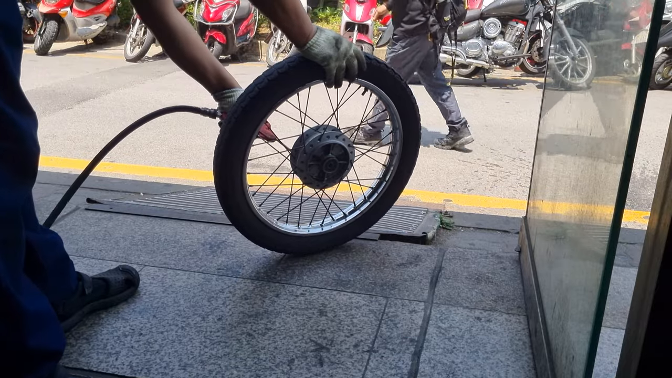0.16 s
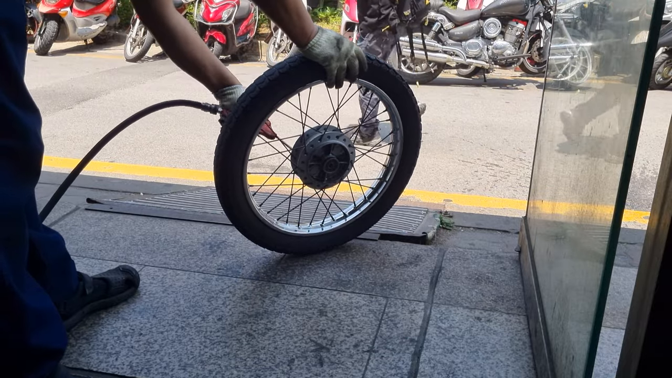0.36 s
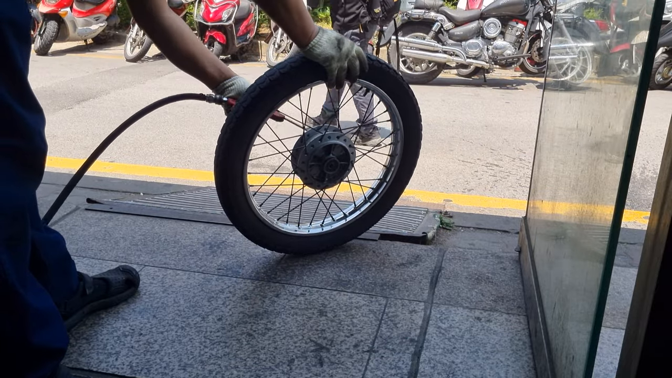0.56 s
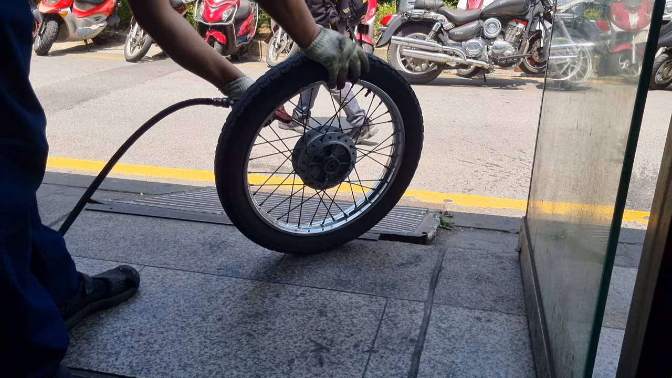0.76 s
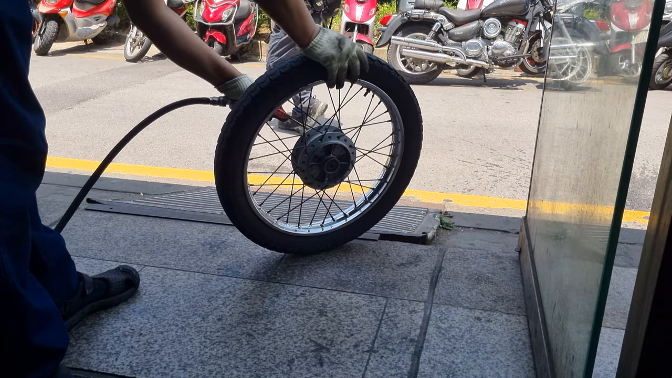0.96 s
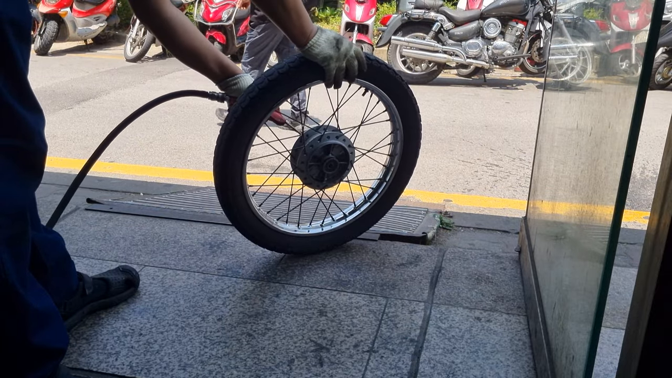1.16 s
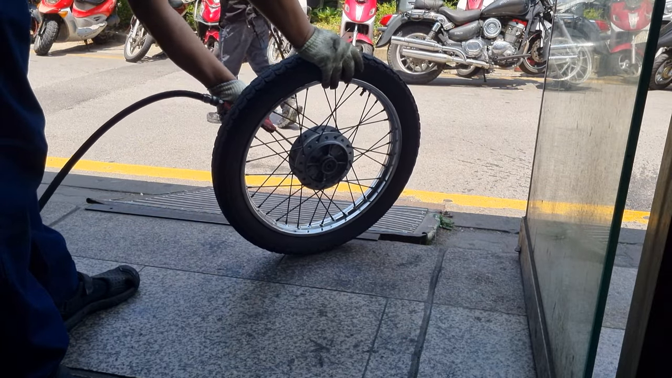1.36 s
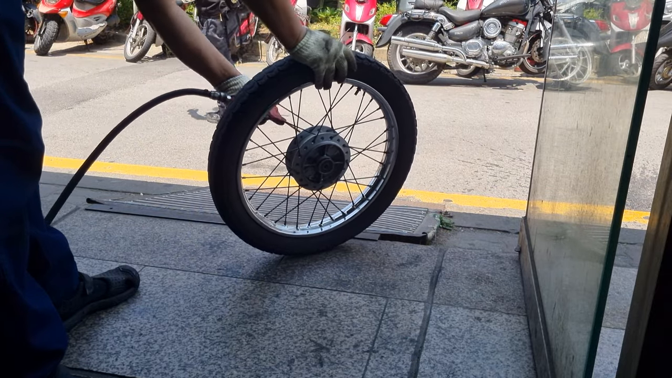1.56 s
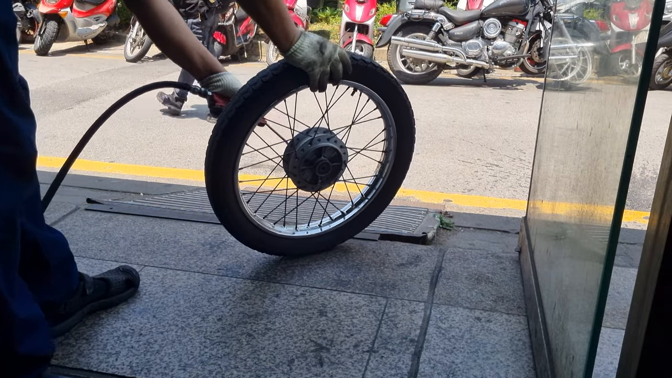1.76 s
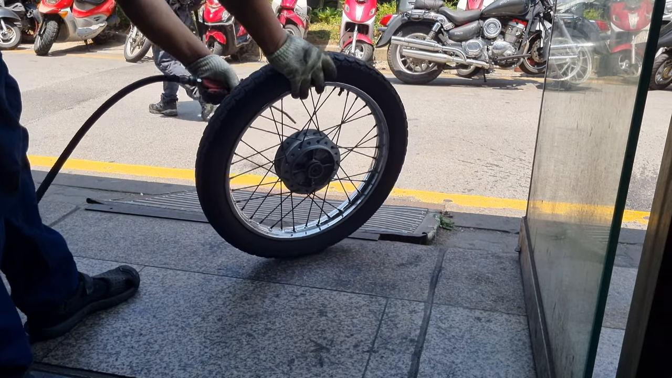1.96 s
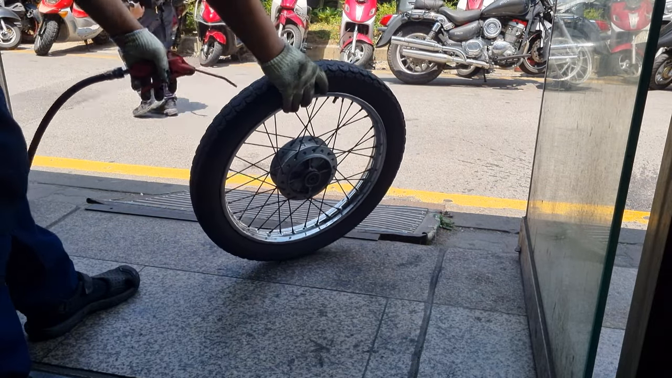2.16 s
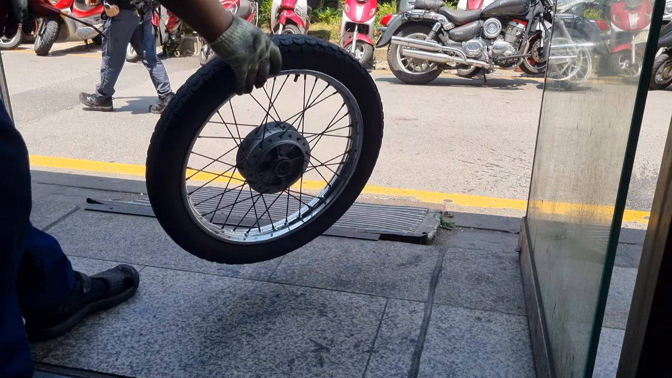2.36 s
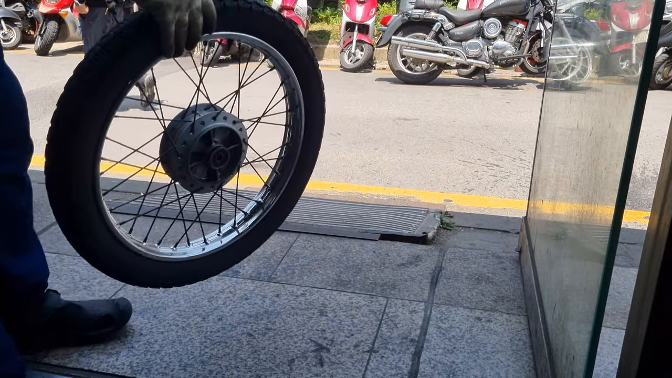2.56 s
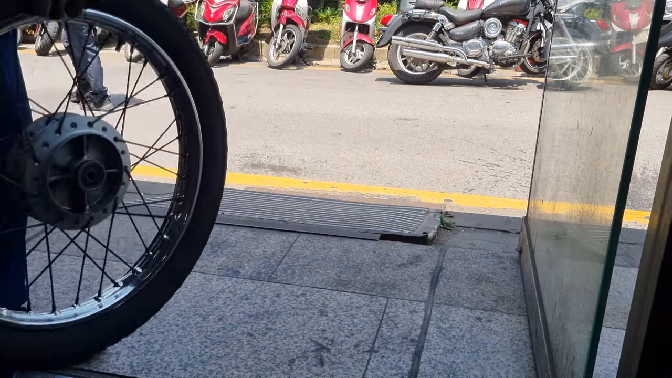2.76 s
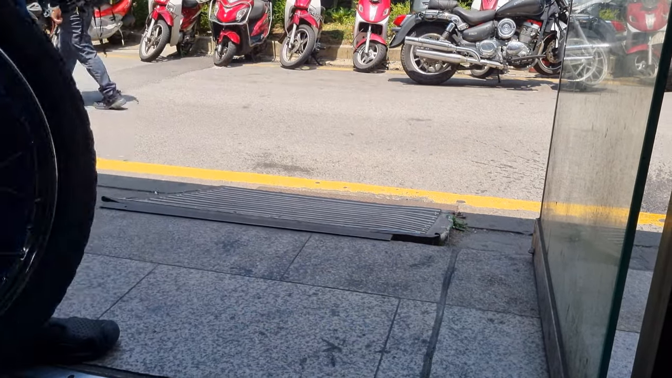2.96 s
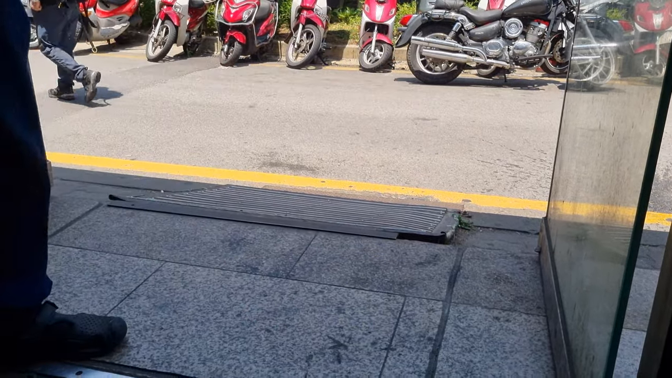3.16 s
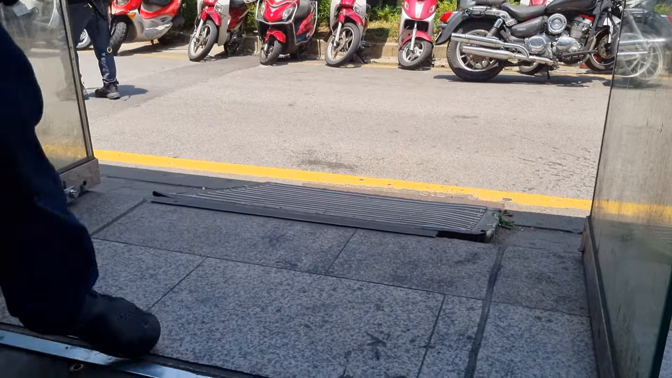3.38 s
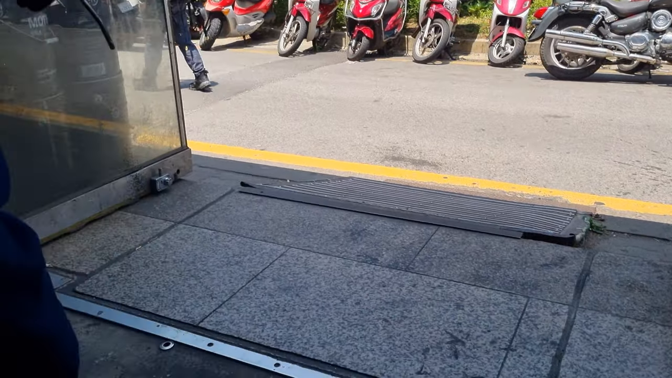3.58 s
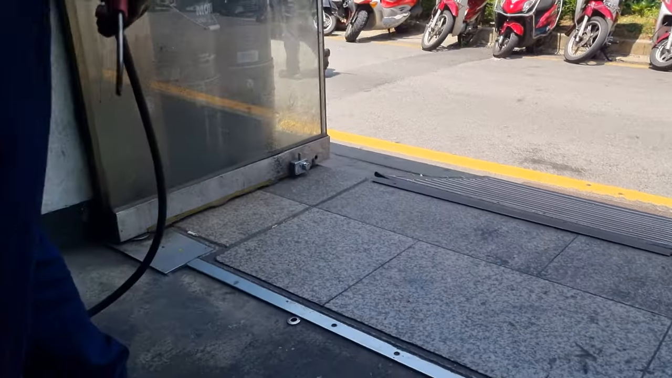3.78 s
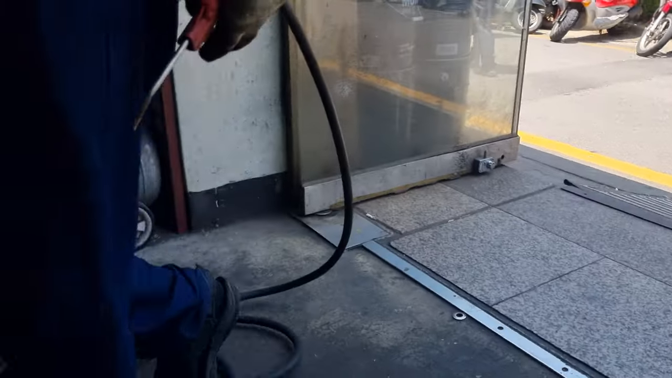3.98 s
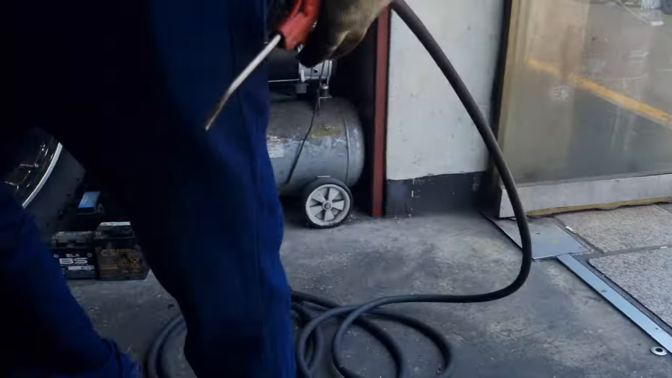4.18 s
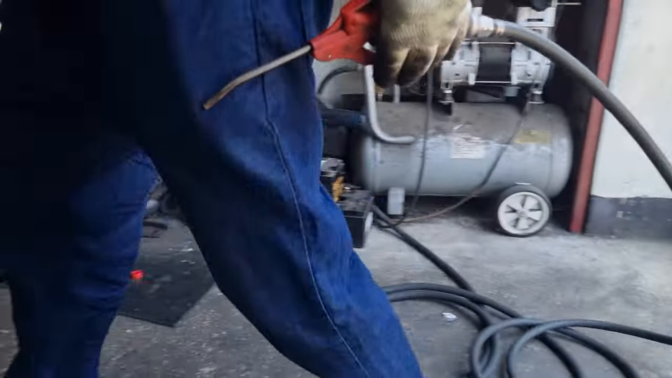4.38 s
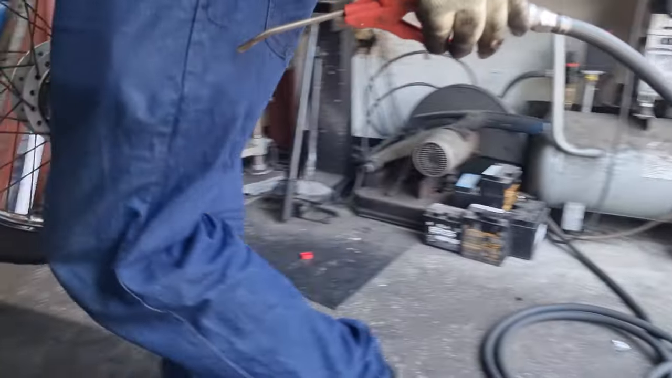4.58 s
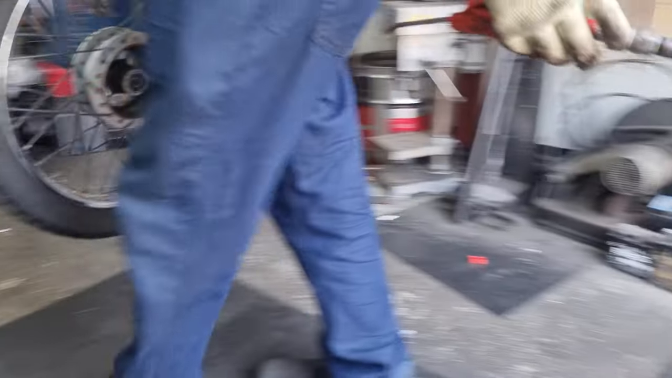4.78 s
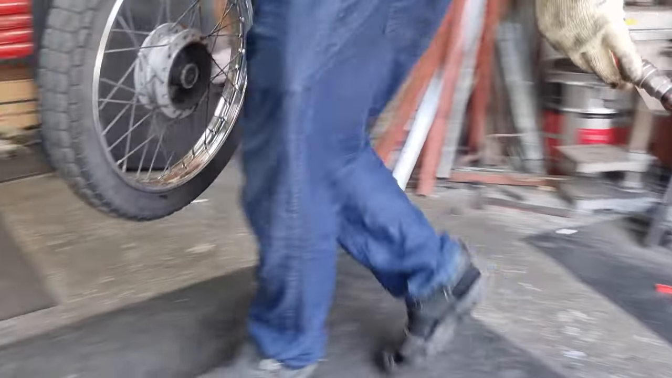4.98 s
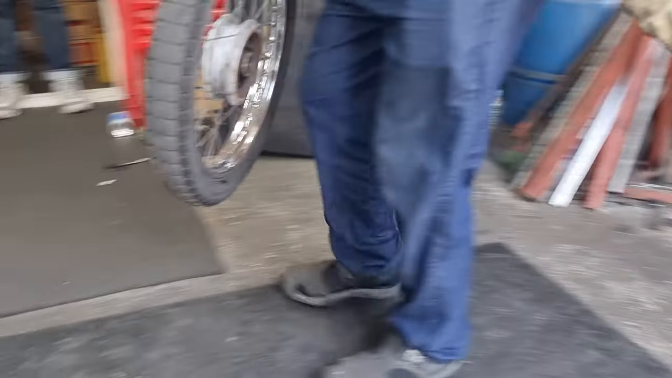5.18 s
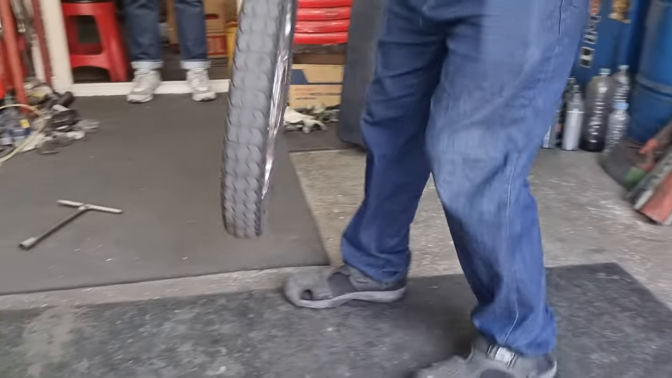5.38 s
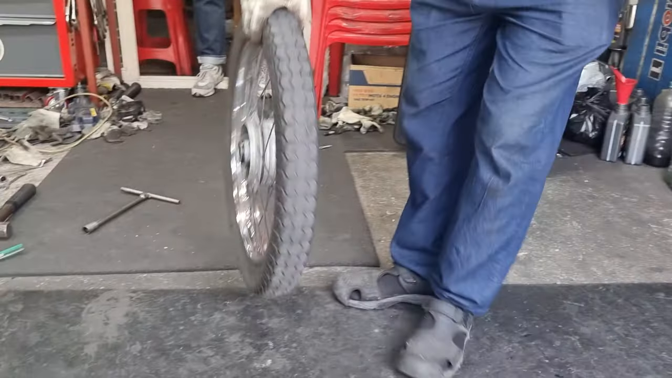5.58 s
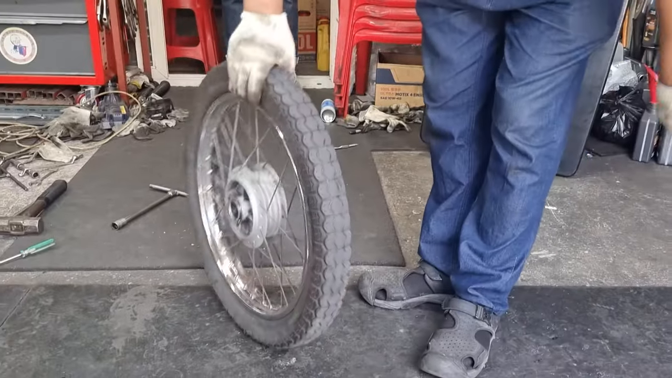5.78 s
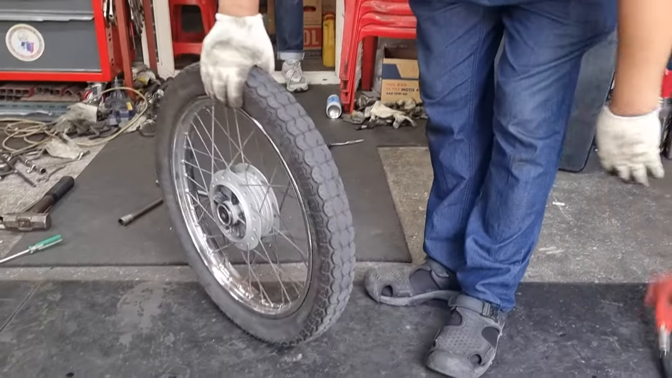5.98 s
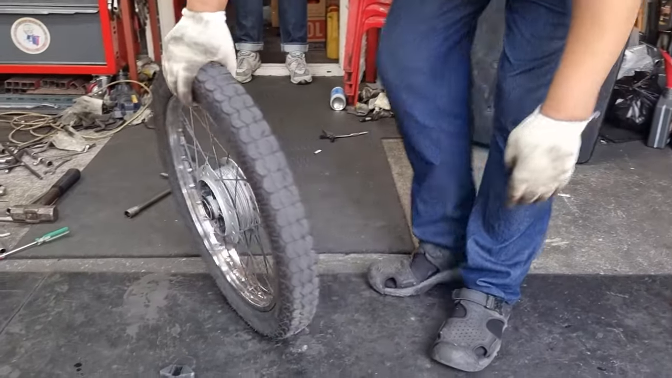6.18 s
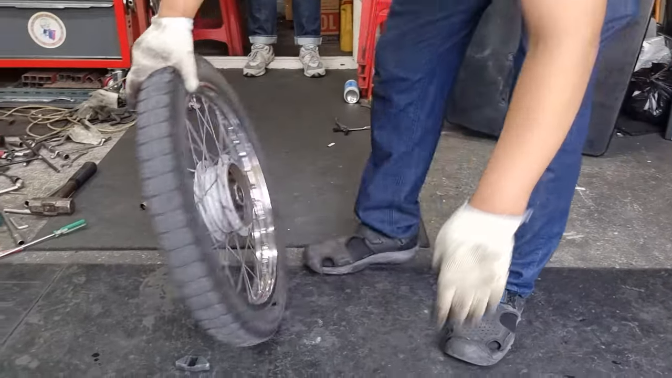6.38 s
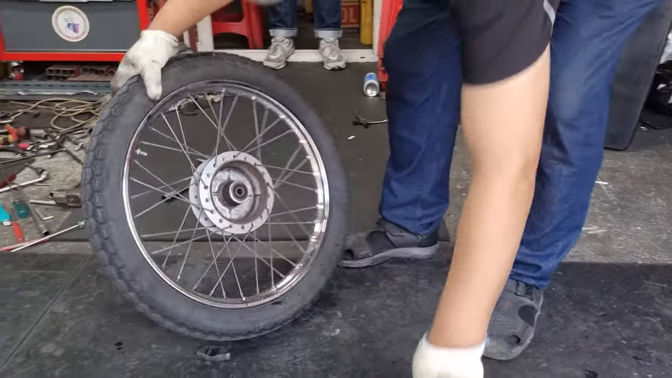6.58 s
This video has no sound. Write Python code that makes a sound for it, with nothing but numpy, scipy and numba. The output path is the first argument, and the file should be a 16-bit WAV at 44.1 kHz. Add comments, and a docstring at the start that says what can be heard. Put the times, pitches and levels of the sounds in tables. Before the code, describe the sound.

Close microphone at a small garage: one bright metallic tick, a thin leak, then a strong turbulent air jet with brief whistles and low buffeting. After the release fades, it is quiet apart from soft gritty soles. Indoors the low engine drone and street noise swell, with scuffs, dull thuds of feet and wheel, then a dropped metal tool clattering in quick bounces with a short room echo.

```python
"""In a workshop doorway, street wash and an idling engine's drone lie behind everything; a nozzle clinks on a spoke.
A blow gun leaks a thin hiss, then blows over a wheel: turbulent noise, ringing tube modes and low buffeting.
After release, shoes scuff in noise bursts as the microphone turns into the shop, and feet and wheel knock dully.
Last, the gun drops and bounces as damped modes with cracks, and its fitting chatters. Near sounds ring in the room."""
import sys
import numpy as np
from scipy import signal
from scipy.io import wavfile
from scipy.ndimage import uniform_filter1d
from numba import njit

SR = 44100
rng = np.random.default_rng(int(sys.argv[2]) if len(sys.argv) > 2 else 0)


def master_out(mix):
    """Clip the mix to full scale and print it as 16-bit PCM to the path in sys.argv[1]."""
    frames = np.transpose(np.atleast_2d(mix))
    ceiling = np.clip(frames, -1, 1)
    pcm = np.round(ceiling * 32767).astype(np.int16)
    wavfile.write(sys.argv[1], SR, pcm)


N = 292824
T = np.arange(N) / SR
SHORT_T = T[:SR // 2]  # half a second, for single events and the room

# background behind the near sounds, for street and engine: start_s, level_db, treble_db (against the level)
BACKGROUND_LEVELS = [(0., -36, -7.5), (.43, -33.5, -10.5), (.6, -47, -8.5), (3.17, -48.5, -10.5),
                     (3.72, -39, -11), (4.38, -30.5, -8), (5.6, -27, -7.5), (6.07, -28, -14),
                     (6.1, -33.5, -4), (6.36, -32.5, -12), (6.64, -35.5, -7.5)]


def undb(db):
    """Gain of a dB value."""
    return 10 ** (np.asarray(db) / 20)


@njit
def svf(x, hz, width):
    """State-variable band-pass with a moving centre, gain 1 there."""
    y, band_state, low_state = np.empty(len(x)), 0., 0.
    for i in range(len(x)):
        g, damping = np.tan(np.pi * hz[i] / SR), width / hz[i]
        v = (band_state + g * (x[i] - low_state)) / (1 + g * (g + damping))
        band_state = 2 * v - band_state
        low_state += 2 * g * v
        y[i] = damping * v
    return y


def band(hz, width, n=N):
    """Fresh noise through a resonance applied twice; rms 1."""
    hz = np.clip(hz * np.ones(n), 20, .45 * SR)
    once = svf(rng.standard_normal(n), hz, 1. * width)
    twice = svf(once, hz, 1. * width)
    return twice / twice.std()


def walk(rate):
    """Random levels held 1 / rate s and slewed twice; spread near 1."""
    k = int(SR / rate)
    steps = np.repeat(rng.standard_normal(N // k + 1), k)
    return 1.75 * uniform_filter1d(uniform_filter1d(steps, k), k)[:N]


def columns(rows):
    """Curve rows joined by straight lines in time."""
    s, *cols = np.transpose(rows)
    return [np.interp(T, s, c) for c in cols]


def add(out, s, x):
    """Mix x into out from time s on."""
    i = int(s * SR)
    out[i:i + len(x)] += x[:len(out) - i]


def ring(modes, soft_db=0):
    """One blow into damped modes (Hz, dB, t60 s); a soft blow wakes the high ones less."""
    total = np.zeros(len(SHORT_T))
    for k, (hz, db, t60) in enumerate(modes):
        decay = undb(db - soft_db * np.log2(hz / 500) - 60 * SHORT_T / t60)
        sign = (-1) ** k
        total += sign * decay * np.sin(2 * np.pi * hz * SHORT_T + rng.uniform(0, .3))
    return total / 2


def burst(rise, hold, t60, hz, width, grit_db=1.0):
    """Noise roughened by grains of grit; it rises, holds and dies away."""
    fall = undb(-60 * np.maximum(SHORT_T - rise - hold, 0) / t60)
    shape = np.clip(SHORT_T / rise, 0, 1) * fall
    grain_db = grit_db * np.repeat(rng.standard_normal(len(SHORT_T) // 70), 70)  # 70 samples a grain
    grit = undb(grain_db)
    return shape * grit / np.sqrt(np.mean(grit ** 2)) * band(hz, width, len(SHORT_T))


def hum(hz, width, clean):
    """A tone with a rough halo of noise; clean is the tone's share of the power."""
    clean = np.clip(clean, 0, 1)
    tone = np.sqrt(2 * clean) * np.sin(2 * np.pi * np.cumsum(hz) / SR)
    return tone + np.sqrt(1 - clean) * band(hz, width)


def indoors():
    """0 while the microphone faces the street, rising over a second to 1 once it has turned into the shop."""
    turned_s = 4.56
    return np.clip(T - turned_s + 1, 0, 1)


def street():
    """Traffic wash in third-octave noise bands that flicker alone, with a few narrow bands standing out."""
    # spectrum of the wash: centre_hz, density_db (per Hz, relative)
    street_colour = [(150, -26), (250, -5.5), (308, -13), (772, -13.5), (934, -13), (1370, -13),
                     (1490, -14), (2000, -20), (2470, -23), (3370, -21), (4150, -23), (6630, -36.5),
                     (9880, -36.5), (15800, -50.5)]
    # narrow bands, stronger indoors: centre_hz, width_hz, level_db (relative)
    shop_tones = [(950, 60, -13), (1390, 40, -13), (2060, 40, -13)]
    level_db, treble_db = columns(BACKGROUND_LEVELS)
    hz_points, db_points = np.transpose(street_colour)
    centres = 250 * 2 ** (np.arange(19) / 3)
    # a wider band gathers more power from the same density
    weight_db = np.interp(np.log(centres), np.log(hz_points), db_points) + 10 * np.log10(centres)
    bands = np.array([undb(db + 0.72 * walk(7.7)) * band(hz, hz / 3) for hz, db in zip(centres, weight_db)])
    low, high = bands[:10].sum(axis=0), bands[10:].sum(axis=0)  # the high part starts near 2.5 kHz
    tones = sum(undb(db - 2 + 2.5 * walk(6)) * band(hz, width) for hz, width, db in shop_tones)
    tones = np.maximum(indoors(), .2) * tones
    return undb(level_db) * (low / low.std() + tones + undb(treble_db) * high / high.std())


def engine():
    """An idling engine: a low drone with a noise halo, a second one above it and deep rumble."""
    # drone: start_s, pitch_hz, level_db, upper_level_db (both levels against the background)
    drone_curve = [(0., 134, 5.5, -0.5), (.4, 138, -1, -9.5), (.7, 119, -4, -2), (1.87, 124, -3, -1.3),
                   (2.73, 121, 1, -5.5), (3.1, 118, -3, -0.3), (3.79, 115, 3, -2), (4.2, 116, 3, -4),
                   (4.28, 116, -4, -6), (4.62, 116, -3, -5), (4.85, 120.5, 3.5, -11.5),
                   (5.69, 122.5, 1, -12), (6.05, 120.5, 3.5, -8.5), (6.11, 119, -4, -7.5),
                   (6.64, 122, -4, -13)]
    inside = indoors()
    hz, drone_db, upper_db = columns(drone_curve)
    clean = .68 + (.8 - .68) * inside  # the drone is purer indoors
    # the rumble loses 5 dB as the microphone turns into the shop
    rumble = undb(-4.5 - 5 * inside) * (band(52, 33) + band(93, 30.45))
    upper = undb(upper_db) * hum(212 * (1 + .008 * walk(2)), 40, .8)
    drone = undb(drone_db) * (hum(hz, 35, clean) + undb(-8.5) * band(153.4, 32))
    return undb(columns(BACKGROUND_LEVELS)[0]) * (drone + upper + rumble)


def shoe_scuffs():
    """Soles rub over the floor: gritty noise bursts, each with a lower body from the sole."""
    # scuffs: start_s, rise_s, hold_s, level_db, centre_hz (the two parts lie below this)
    scuffs = [(2.54, 0.072, .073, -43, 4550), (2.838, .008, 0.018, -61.5, 6500),
              (3.312, .01, 0.028, -49.5, 6820), (3.335, .015, .02, -44, 1900),
              (3.42, .01, .02, -57.5, 6000), (3.69, .03, .12, -59, 8000), (3.872, .015, .04, -51, 6500),
              (4.348, .005, 0.023, -39.5, 6950), (4.409, .015, 0.11, -31.5, 3300),
              (4.843, 0.008, .043, -39, 7000), (4.859, .01, .033, -28, 2310),
              (5.354, .004, .015, -48, 8500), (5.495, 0.054, .029, -34.5, 4100),
              (5.628, .014, 0.029, -41.5, 8500), (5.64, 0.0063, 0.035, -31, 3500),
              (6.039, .009, 0.012, -37.5, 4200)]
    t60_s, relative_width, body_db = .12, 1.1, -4
    out = np.zeros(N)
    for s, rise, hold, db, hz in scuffs:
        for share, part_db in ((0.93, 0), (0.39, body_db)):
            centre = share * hz
            rub = burst(rise, hold, t60_s, centre, relative_width * centre, grit_db=1.5)
            add(out, s, undb(db + part_db) * rub)
    return out


def knocks():
    """Feet and wheel knock dully: a short noise thud, a damped tone at its pitch and a click on top."""
    # knocks: start_s, thud_level_db, pitch_hz, click_level_db
    knock_list = [(3.888, -33, 950, -55), (3.965, -35, 1000, -55), (4.35, -32, 400, -50),
                  (4.578, -28, 1150, -50), (5.025, -25, 450, -45), (5.4, -22, 290, -28),
                  (5.866, -21, 420, -23)]
    t60_s = .08
    out = np.zeros(N)
    for s, db, hz, click_db in knock_list:
        thud = undb(db) * burst(.001, .004, t60_s, hz, .7 * hz)
        click = undb(click_db) * burst(.0005, .002, .02, 2000, 2200)
        tone = undb(db + 9) * ring([(hz, 0, t60_s / 3)])
        add(out, s, thud + click + tone)
    return out


def spoke_clink():
    """The nozzle touches a spoke: damped metal modes and a short burst of contact noise."""
    # spoke modes: pitch_hz, level_db (relative), t60_s
    spoke_modes = [(1750, -10.5, .03), (2710, -12, .06), (3080, -7, 0.13), (4670, -9.5, 0.019),
                   (6150, -7, 0.11), (6340, 0, 0.059)]
    clink_s, clink_db = .148, -17.5
    out = np.zeros(N)
    contact = 0.7 * burst(0.00057, 0.0015, 0.026, 3100, 5300)
    add(out, clink_s, undb(clink_db) * (ring(spoke_modes) + contact))
    return out


def dropped_gun():
    """The gun hits the floor and bounces: each blow rings its damped modes and cracks; its fitting rattles."""
    # blows: start_s, blow_db (gain on the modes), softness_db (lost per octave above 500 Hz), crack_db
    blows = [(6.084, -6, -1.5, -13), (6.102, -20, 16, -30), (6.116, -5, 21, -28), (6.137, -13, 12, -33),
             (6.223, -24, 7, -23.5), (6.2335, -6.5, 12, -38)]
    # gun modes: pitch_hz, level_db (relative), t60_s
    gun_modes = [(467, -4, 0.073), (560, -3, 0.085), (650, 0, 0.024), (780, -3, 0.022), (1000, 10, 0.014),
                 (1430, -1, 0.026), (4220, -2, 0.042)]
    out = np.zeros(N)
    for s, blow_db, soft_db, crack_db in blows:
        add(out, s, undb(blow_db) * ring(gun_modes, soft_db))
        add(out, s, undb(crack_db) * burst(0.00027, 0.00079, 0.017, 3700, 7000))
    # nozzle and hose fitting chatter on the floor after the first blow
    rattle_db, hold_s = -13.5, 0.033
    bright = burst(0.0031, hold_s, 0.2, 3450, 6100)
    dull = 0.76 * burst(0.0033, hold_s, 0.27, 560, 620)
    add(out, blows[0][0], undb(rattle_db) * (bright + dull))
    return out


def air_jet():
    """Turbulence that flutters band by band, the tube modes it excites, and low buffeting on the tyre."""
    # flow: start_s, level_db (all parts together), nearness (nozzle to tyre, 0-1)
    flow = [(.462, -11.5, 0.12), (.6, -10, 0.31), (.72, -10, 0.5), (.77, -10, 0.62), (.86, -11, 0.38),
            (1.03, -11, 0.73), (1.15, -11.5, .6), (1.27, -17, 0.76), (1.295, -10, 0.48), (1.5, -10.5, 0),
            (1.66, -11.5, 0.48), (1.88, -10.5, 0.4), (2.01, -9.5, .5), (2.05, -10, .15), (2.1, -12, .3)]
    # broad turbulence between the modes: centre_hz, level_db (relative)
    turbulence = [(1500, -21.5), (2300, -18), (3300, -14), (4400, -9.5)]
    # higher tube modes: pitch_hz, width_hz, level_db (relative)
    high_modes = [(5660, 340, -16), (6700, 75, -21.5)]
    # main tube modes: pitch_hz, width_hz, level_db (relative, nozzle far off), gain_db (close in), flicker_db
    main_modes = [(1950, 210, -9.5, 1.5, .7), (3173, 340, -16, 8, 2), (4334, 340, -12, -0.5, 1.8)]
    # the jet grazes an edge and whistles: centre_s, half_length_s, whistle_level_db (relative)
    grazes = [(0.77, 0.027, -4.5), (1.795, 0.015, 5), (1.998, 0.021, 4.5)]
    level_db, near = columns(flow)

    graze_shapes = [(np.exp(-((T - s) / half) ** 2), db) for s, half, db in grazes]
    rest_db = -22  # whistle between grazes
    whistle_db = rest_db + sum(shape * (db - rest_db) for shape, db in graze_shapes)
    grazing = sum(shape for shape, _ in graze_shapes)

    # close in, the treble dulls and the buffeting grows; a graze does both as well
    treble_db = -4 - 7.5 * near - 3.5 * grazing
    buffet_db = -24 + 11.5 * near
    # the nozzle swings away from the tyre: its main modes drop, the treble opens
    away_s, away_loss_db, away_treble_db = 2.04, 7, 2.1
    away = np.clip((T - away_s) / .015, 0, 1)
    treble_db = treble_db + away_treble_db * away

    parts = [(db + 0.81 * walk(20), band(hz, 0.43 * hz)) for hz, db in turbulence]
    # sizzle: patches of treble flare alone
    parts += [(-9.5 + 1.3 * walk(18), band(hz, 1600)) for hz in (5300, 6300, 7300, 8400)]
    for hz, width, db in high_modes:
        parts.append((db + 3 * walk(9.21), band(hz * (1 + .015 * walk(5.4)), width)))
    sag_db = [2 * (T - 1), 0, 0]  # the first main mode sags 2 dB per second
    for (hz, width, db, gain_db, flicker_db), sag in zip(main_modes, sag_db):
        mode_db = db + gain_db * near - sag - away_loss_db * away + flicker_db * walk(13.97)
        parts.append((mode_db, band(hz * (1 + 0.003 * walk(7.4)), width)))
    parts.append((whistle_db, band(3892, 240)))
    parts += [(treble_db, band(10300, 6700)), (treble_db - 8, band(14000, 7000))]
    parts.append((buffet_db + 4 * grazing + 1.9 * walk(25), band(1110, 530)))
    parts.append((buffet_db - 9.0, band(450, 500)))

    # the flow sets the total power; the parts share it
    total_power = sum(undb(2 * db) for db, _ in parts)
    hiss = sum(undb(db) * noise for db, noise in parts) / np.sqrt(total_power)
    opening = np.clip((T - flow[0][0]) / 0.007 + 1, 0, 1)
    emptying = undb(-60 * np.maximum(T - flow[-1][0], 0) / 0.14)  # the hose empties after release
    hiss *= undb(level_db + 1.04 * walk(60.17)) * opening * emptying
    # thin hiss as the trigger starts to give
    leak_s, leak_db = .424, -26
    add(hiss, leak_s, undb(leak_db) * burst(.03, .008, .02, 7000, 9000))
    return hiss


def room(near):
    """The small shop's echo: noise that dies away, faster in the treble, convolved with the near sounds."""
    t60_s, treble_t60_s, split_hz, level_db = 0.39, .25, 6000, -9
    noise = rng.standard_normal(len(SHORT_T))
    low = signal.sosfilt(signal.butter(1, split_hz, fs=SR, output="sos"), noise)
    tail = low * undb(-60 * SHORT_T / t60_s) + (noise - low) * undb(-60 * SHORT_T / treble_t60_s)
    echo = tail * np.clip(SHORT_T / 0.0066, 0, 1)
    return undb(level_db) * signal.fftconvolve(near, echo / np.sqrt(np.sum(echo ** 2)))[:N]


def scene():
    """Near sources ring in the small shop; street and engine come in as they are, on two equal channels."""
    near = shoe_scuffs() + knocks() + spoke_clink() + dropped_gun() + air_jet()
    return np.tile(street() + engine() + near + room(near), (2, 1))


def record(dry):
    """The microphone drops the deepest bass, the loudest peaks are rounded off and the top is cut."""
    top_hz = 15880
    dry = signal.sosfilt(signal.butter(3, 40, "high", fs=SR, output="sos"), dry)
    rounded = dry / (1 + np.abs(dry / .95) ** 6) ** (1 / 6)
    return signal.sosfilt(signal.ellip(10, .2, 70, top_hz, fs=SR, output="sos"), rounded)


dry = scene()
out = record(dry)
master_out(out)
```